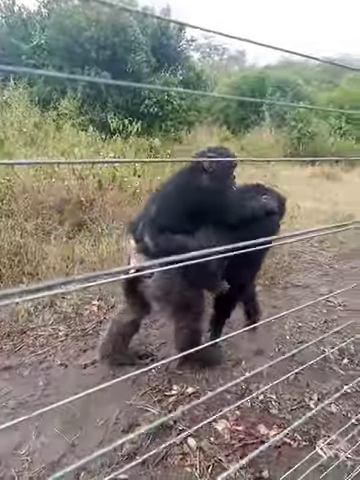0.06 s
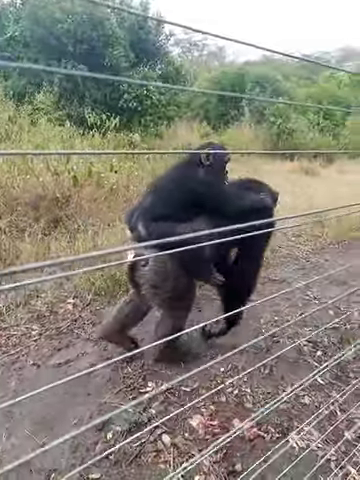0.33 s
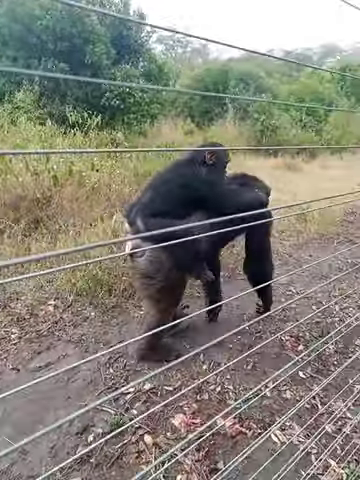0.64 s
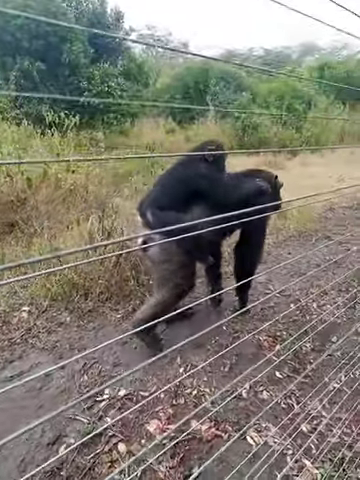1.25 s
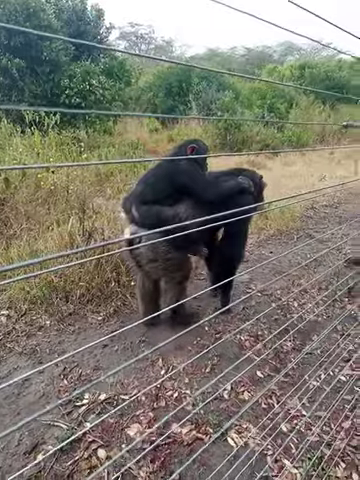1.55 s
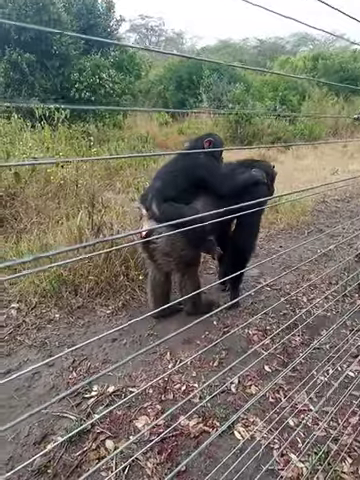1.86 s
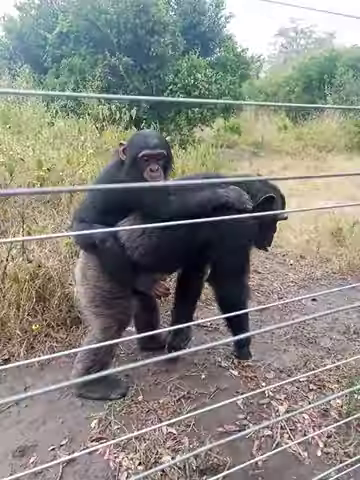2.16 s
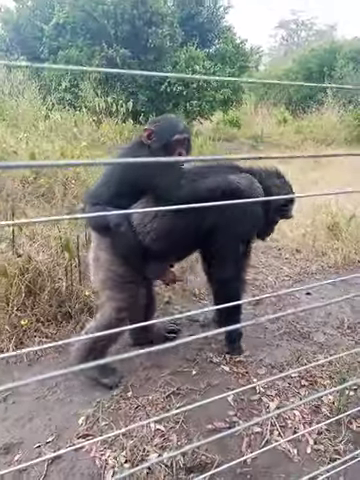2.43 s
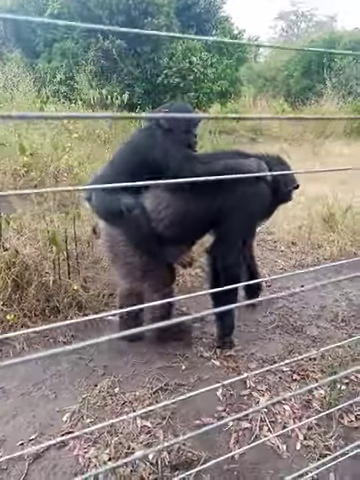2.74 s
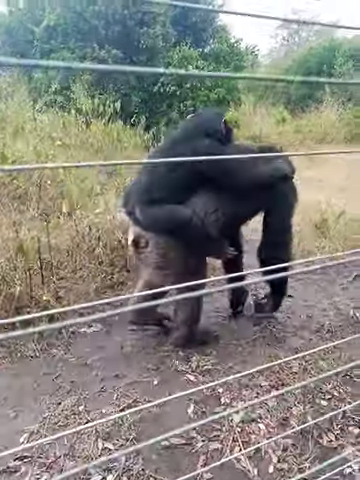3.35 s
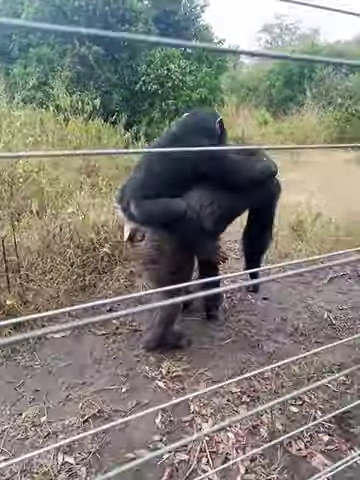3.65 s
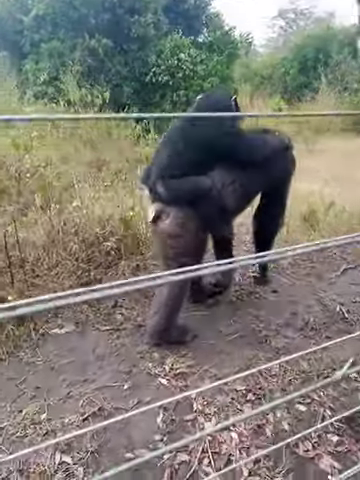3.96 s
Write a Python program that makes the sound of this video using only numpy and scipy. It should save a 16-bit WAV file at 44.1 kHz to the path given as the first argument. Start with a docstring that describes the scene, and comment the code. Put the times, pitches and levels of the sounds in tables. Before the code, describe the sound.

Small birds trade thin, rising chirps in quiet scrub, joined early by a few short nasal squawks. Dry litter ticks and snaps, and near the end the hand-held microphone is bumped and rubbed.

```python
"""Two small birds trade thin, rising chirps in the scrub beside a wire enclosure: gliding whistles with
side tones from a second vibration. Short nasal squawks and falling chips join in; the bushes echo.
Dry litter ticks and scuffs, with one sharp double snap, over a quiet outdoor hush and far twitters.
The hand-held microphone is bumped and, near the end, rubbed: low thuds and a scratchy rustle."""
import sys
import numpy as np
from scipy import signal
from scipy.fft import rfft, irfft
from scipy.io import wavfile
from scipy.ndimage import uniform_filter1d

SR = 44100
rng = np.random.default_rng(int(sys.argv[2]) if len(sys.argv) > 2 else 0)


def transcribe(signal):
    """Save signal, clipped to [-1, 1], as a 16-bit WAV file at the path in sys.argv[1]."""
    frames = np.atleast_2d(signal).T
    limited = np.clip(frames, -1, 1)
    pcm = np.round(limited * 32767).astype(np.int16)
    wavfile.write(sys.argv[1], SR, pcm)


N = 176400

# Background spectra: freq_hz, gain_db
HUSH_SPECTRUM = [(25, -21), (85, 0), (160, -4.5), (230, -10), (420, -13), (800, -17.5), (1900, -18),
                 (3000, -22), (5400, -32.5), (8600, -37.5), (13000, -38), (15200, -25), (16400, -53)]
BREEZE_SPECTRUM = [(35, -24.5), (60, -3), (95, 0), (140, -3.5), (250, -25.5)]
LITTER_SPECTRUM = [(2800, -29), (4200, 1.5), (5600, 4), (7000, -21.5), (9000, -45)]
# Leaves and far birds: time_s, level_db
LITTER_ENVELOPE = [(0, -65.5), (.37, -68), (.43, -75), (1.0, -71), (2.0, -69), (2.58, -66.5), (2.76, -59.5),
                   (2.95, -64.5), (3.12, -63), (3.22, -66), (4.0, -61)]
HUSH_DB, BREEZE_DB, BREEZE_SWING_DB = -70, -67.5, 4.5
LITTER_SWING_DB, LITTER_SWING_HZ = 1.5, 14
TWITTERS_PER_S, TWITTER_S, TWITTER_LOW_HZ, TWITTER_HIGH_HZ = 18, .035, 4100, 5800

# Grip rumble: freq_hz, gain_db
RUMBLE_SPECTRUM = [(25, -22), (55, 3.5), (90, 5.5), (175, -7.5), (290, -20.5), (480, -40)]
# Grip rumble: time_s, level_db
RUMBLE_ENVELOPE = [(2.32, -71), (2.36, -45), (2.45, -47), (2.52, -82), (3.22, -73), (3.25, -33.5),
                   (3.29, -46.5), (3.35, -37.5), (3.45, -40), (3.52, -29), (3.57, -55.5), (3.625, -36),
                   (3.70, -50), (3.76, -62.5), (3.96, -57.5)]
# Microphone bumps: centre_s, width_s, level_db, pitch_hz
MIC_BUMPS = [(2.368, 0.0041, -31.5, 108.5), (2.408, 0.011, -36, 91), (2.435, 0.0053, -39.5, 133),
             (2.702, 0.015, -47.5, 48.6), (2.751, 0.0084, -44.5, 99), (2.809, 0.01, -41, 83),
             (3.262, 0.0041, -22.5, 118), (3.365, 0.0039, -29.5, 146), (3.513, .014, -28, 89.2),
             (3.638, 0.0054, -30, 102)]
# Rubbing strokes: start_s, length_s, crest_fraction, middle_db, treble_db, top_db
RUB_STROKES = [(3.42, 0.032, 0.8, -46, -47.5, -62), (3.45, 0.062, 0.23, -44.5, -43.5, -56),
               (3.484, 0.086, 0.39, -53.5, -51.5, -67), (3.523, 0.33, 0.24, -58.5, -52.5, -72),
               (3.613, 0.061, 0.86, -46, -43, -53.5), (3.647, 0.012, 1, -36, -66, -68),
               (3.792, 0.036, 0.34, -56, -45.5, -47.5), (3.822, 0.13, 0.15, -52, -43, -53.5)]
# Casing ranges: freq_hz, gain_db
CASING_MIDDLE = [(250, -20), (450, -9), (750, 0.5), (1000, -5), (1350, 2), (1650, -4), (2100, 2),
                 (3000, -11), (4000, -24)]
CASING_TREBLE = [(2600, -23.5), (4000, 8), (5200, 10.5), (6500, 8), (8000, -7.5), (11000, -53)]
CASING_TOP = [(6500, -7), (8500, -13), (13500, -12), (15200, 3.5), (15900, -10), (16300, -34)]
STROKE_EXPONENT, SKIN_CATCH_DB, SKIN_CATCH_HZ = .96, 1, 90
FRICTION_GRAINS_PER_S, FRICTION_SPREAD_DB, FRICTION_HISS_GAIN = 1800, 4, .35

# Brushed litter: start_s, decay_s, level_db, centre_hz
LITTER_SCUFFS = [(2.13, .03, -53, 5900), (2.426, .016, -56, 2900)]
# Dry stalks: start_s, ring_peak_db, ring_hz, crack_re_ring_db
STALK_TICKS = [(0.461, -54, 7600, 3), (1.467, -31, 5000, -45), (1.948, -39, 5200, -44),
               (2.132, -48, 6630, -48), (2.675, -38, 5570, -37), (2.836, -46.5, 4970, -42),
               (2.895, -46, 5120, -40), (3.203, -41.5, 4330, -29), (3.3198, -37.5, 5020, -41),
               (3.401, -36, 6100, -37), (3.625, -27, 5200, -35), (3.7035, -44, 5270, -32),
               (3.723, -46, 4480, -30), (3.7745, -41.5, 7400, -14), (3.7966, -35.5, 6100, -4),
               (3.8037, -35, 5440, -19), (3.864, -27.5, 5400, -20)]
# Double snap: start_s, impulse_db
SNAP_CLICKS = [(1.6332, -33.5), (1.6452, -36.5)]
# Snap modes: freq_hz, gain_db, t60_s
SNAP_RESONANCES = [(355, -6, 0.021), (2350, -4, 0.005), (4170, 8, 0.0019), (5560, -0.5, 0.0036),
                   (10500, -33, .0006), (15000, 1, 0.00076)]
TICK_T60_S, TICK_SCATTER_S = .0025, .0007

# Falling chips: start_s, gain_db
CHIP_NOTES = [(2.704, -52.5), (2.72, -50), (2.784, -59), (2.804, -56.5), (2.823, -51)]
# Nasal notes: start_s, length_s, gain_db, start_hz, middle_hz, end_hz
SQUAWK_NOTES = [ (.573, .039, -50.5, 985, 990, 850), (.72, .044, -49, 880, 948, 880),
                (.757, .035, -46, 930, 1015, 880), (.872, .046, -49, 860, 945, 900),
                (.908, .034, -48.5, 960, 915, 830)]
# Squawk timbre: harmonic_number, gain_db
SQUAWK_PARTIALS = [(3, -25), (4, -22), (5, -2.5), (6, -5), (7, -25), (8, -22), (10, -34)]
# Chirps: start_s, length_s, gain_db, start_hz, third_hz, two_thirds_hz, end_hz, spacing_hz, side_db
CHIRP_NOTES = [ (0, .05, -52, 6750, 6950, 7100, 7200, 1800, -18),
               (.128, .128, -52.5, 5650, 6080, 6620, 7020, 1850, -14),
               (.636, .036, -48.5, 5400, 5950, 6300, 6400, 2300, -30),
               (1.022, .092, -45.5, 5300, 5600, 5450, 6750, 1950, -12),
               (1.059, .075, -46.5, 5800, 5000, 4900, 6900, 1850, -15),
               (1.217, .165, -45.5, 5950, 6550, 6800, 7300, 1870, -16),
               (1.279, .092, -50, 5950, 5850, 6100, 6750, 1750, -8),
               (1.539, .142, -48.5, 5650, 6150, 6500, 7300, 1880, -13),
               (1.57, .038, -52, 4800, 4650, 4050, 3500, 1300, -10),
               (1.76, .08, -50.5, 5450, 5200, 4200, 5800, 1950, -11),
               (1.798, .107, -47.5, 5500, 5650, 6200, 7350, 1780, -12),
               (2.264, .098, -50.5, 5100, 5480, 5830, 6500, 1780, -15),
               (2.518, .2, -59, 6100, 6580, 6850, 7300, 1740, -14),
               (3.754, .034, -50, 6400, 5950, 5600, 5500, 1800, -18)]
CHIP_S, CHIP_TOP_HZ, CHIP_END_HZ = .0162, 5100, 3750
ATTACK_S, RELEASE_S, FADE_DB = .011, .008, 2.3
FLUTTER_DB, FLUTTER_RATE_HZ, WAVER_HZ, WAVER_RATE_HZ = 2.6, 110, 105, 330
SCOOP_FRACTION, SCOOP_S, FULL_SCOOP_LENGTH_S = .21, .0075, .1203
LOWER_SIDE_DB, SIDE_FALL_DB_PER_HZ, OCTAVE_DB = -22, .010, -31
RASP_DB, RASP_SMEAR_S, CHIRP_CUTOFF_HZ = -18, .03, 8800

SCRUB_T60_S, SCRUB_BUILD_S, BIRD_ECHO_DB, CLICK_ECHO_DB = .21, .0044, -6.5, -24
CUTOFF_HZ = 16400


def from_db(db):
    """Decibels to gain."""
    return 10 ** (np.asarray(db) / 20)


def unit_rms(x):
    """Scale to unit power."""
    return x / np.sqrt(np.mean(x ** 2) + 1e-20)


def envelope(points):
    """Level curve to gain per sample; silent before its first point."""
    time_s, level_db = np.transpose(points)
    return from_db(np.interp(np.arange(N) / SR, time_s, level_db, left=-140))


def add(out, start_s, x):
    """Mix x in at start_s."""
    i = max(int(start_s * SR), 0)
    out[i:i + len(x)] += x[:max(N - i, 0)]


def coloured(noise, spectrum):
    """Shape noise to a spectrum; unit power."""
    hz, db = np.transpose(spectrum)
    log_hz = np.log(np.arange(N // 2 + 1) * SR / N + 1)
    gain = from_db(np.interp(log_hz, np.log(hz), db, left=-70, right=-70))
    return unit_rms(irfft(rfft(noise) * gain, N))


def drift(rate_hz, size):
    """Smooth random wander, spread about 1."""
    r = np.exp(-2 * np.pi * rate_hz / SR)
    wander = signal.lfilter([1], [1, -2 * r, r * r], rng.standard_normal(size + SR // 2))
    return unit_rms(wander[-size - SR // 10:])[-size:]


def ring(x, hz, t60_s):
    """One damped resonance."""
    r, w = from_db(-60 / (t60_s * SR)), 2 * np.pi * hz / SR
    return signal.lfilter([0, np.sin(w)], [1, -2 * r * np.cos(w), r * r], x + 1e-18)


def grains(per_s, spread_db, hiss_gain):
    """Random tiny clicks of uneven size in hiss."""
    sizes = from_db(spread_db * np.minimum(rng.exponential(1, N), 5)) * rng.choice([-1, 1], N)
    return unit_rms(sizes * (rng.random(N) < per_s / SR)) + hiss_gain * rng.standard_normal(N)


def note(pitch_hz):
    """Wavering, fluttering sine along a pitch curve."""
    t = np.arange(len(pitch_hz)) / SR
    gate = np.minimum(t / ATTACK_S, 1) * np.minimum((t[-1] - t) / RELEASE_S, 1)
    gain = from_db(FLUTTER_DB * drift(FLUTTER_RATE_HZ, len(t)) - FADE_DB)
    hz = pitch_hz + WAVER_HZ * drift(WAVER_RATE_HZ, len(t))
    return np.sqrt(2) * gate * gain * np.sin(2 * np.pi * np.cumsum(hz) / SR)


def scrub_echo(x):
    """Bushes and trees scatter sound back: a dense tail of unit energy."""
    t = np.arange(SR // 2) / SR
    tail = rng.standard_normal(len(t)) * from_db(-60 * t / SCRUB_T60_S)
    tail *= 1 - np.exp(-t / SCRUB_BUILD_S)
    return signal.fftconvolve(x, tail / np.linalg.norm(tail))[:N]


def twitters():
    """Far birds: short random glides through the bushes; unit power."""
    out = np.zeros(N)
    for slot in range(int(TWITTERS_PER_S * N / SR)):
        start_s = (slot + rng.random()) / TWITTERS_PER_S
        ends_hz = rng.uniform(TWITTER_LOW_HZ, TWITTER_HIGH_HZ, 2)
        add(out, start_s, note(np.linspace(*ends_hz, int(TWITTER_S * SR))))
    return unit_rms(scrub_echo(out))


def outdoors():
    """Steady hush, light air on the microphone, dry leaves mingled with far birds."""
    hush = from_db(HUSH_DB) * coloured(rng.standard_normal(N), HUSH_SPECTRUM)
    gusts = from_db(BREEZE_DB + BREEZE_SWING_DB * drift(rate_hz=6, size=N))
    breeze = gusts * coloured(rng.standard_normal(N), BREEZE_SPECTRUM)
    leaves = coloured(grains(per_s=1500, spread_db=3.5, hiss_gain=1), LITTER_SPECTRUM)
    bushes = unit_rms(leaves + twitters()) * envelope(LITTER_ENVELOPE)
    return hush + breeze + bushes * from_db(LITTER_SWING_DB * drift(LITTER_SWING_HZ, N))


def handling():
    """Soft bumps swing the microphone briefly; the shifting grip rumbles."""
    out = envelope(RUMBLE_ENVELOPE) * coloured(rng.standard_normal(N), RUMBLE_SPECTRUM)
    t = np.arange(-SR // 10, SR // 10) / SR
    for centre_s, width_s, db, hz in MIC_BUMPS:
        thud = np.exp(-.5 * (t / width_s) ** 2) * np.sin(2 * np.pi * hz * t)
        add(out, centre_s + t[0], from_db(db) * thud)
    return out


def rubbing():
    """Skin catches and slips: each stroke sends friction grains into three ranges of the casing."""
    t = np.arange(N) / SR
    friction = grains(FRICTION_GRAINS_PER_S, FRICTION_SPREAD_DB, FRICTION_HISS_GAIN)
    friction *= from_db(SKIN_CATCH_DB * drift(SKIN_CATCH_HZ, N))
    powers = np.zeros((3, N))
    for start_s, length_s, crest_fraction, *bands_db in RUB_STROKES:
        crest_s = start_s + length_s * np.clip(crest_fraction, .02, .98)
        swell = np.interp(t, [start_s, crest_s, start_s + length_s], [0, 1, 0]) ** STROKE_EXPONENT
        powers += (from_db(bands_db)[:, None] * swell) ** 2
    bands = CASING_MIDDLE, CASING_TREBLE, CASING_TOP
    return sum(np.sqrt(power) * coloured(friction, band) for power, band in zip(powers, bands))


def scuffs():
    """Brushed litter: soft, decaying bursts of grains."""
    out, t = np.zeros(N), np.arange(N) / SR
    crunch = grains(FRICTION_GRAINS_PER_S, FRICTION_SPREAD_DB, FRICTION_HISS_GAIN)
    for start_s, decay_s, db, hz in LITTER_SCUFFS:
        decay = (t > start_s) * np.exp(-abs(t - start_s) / decay_s)
        out += from_db(db) * decay * coloured(crunch, [(hz / 2, -24), (hz, 0), (hz * 2, -36)])
    return out


def ticks():
    """A dry stalk gives way: a brief crack that rings for a few cycles."""
    out, t = np.zeros(N), np.arange(SR // 50) / SR
    for start_s, db, hz, crack_db in STALK_TICKS:
        crack = np.diff(rng.standard_normal(len(t)) * np.exp(-t / TICK_SCATTER_S), prepend=0)
        body = ring(ring(crack, hz, TICK_T60_S), hz, TICK_T60_S)
        tick = body / np.abs(body).max() + from_db(crack_db) * crack / np.abs(crack).max()
        add(out, start_s, from_db(db) * tick)
    return out


def double_snap():
    """Two hard clicks into heavily damped modes."""
    out, clicks = np.zeros(N), np.zeros(N)
    for start_s, db in SNAP_CLICKS:
        add(clicks, start_s, from_db([db]))
    for hz, db, t60_s in SNAP_RESONANCES:
        diff_gain = 2 * np.sin(np.pi * hz / SR)
        out += from_db(db) * np.diff(ring(clicks, hz, t60_s), prepend=0) / diff_gain
    return out


def chips():
    """Very short downward whistles."""
    out = np.zeros(N)
    hz = np.linspace(CHIP_TOP_HZ, CHIP_END_HZ, int(CHIP_S * SR))
    for start_s, db in CHIP_NOTES:
        add(out, start_s, from_db(db) * note(hz))
    return out


def squawks():
    """Short nasal notes: an arching buzz, strongest in harmonics 5 and 6."""
    out = np.zeros(N)
    for start_s, length_s, db, *pitches_hz in SQUAWK_NOTES:
        hz = np.polyval(np.polyfit([0, .5, 1], pitches_hz, 2), np.linspace(0, 1, int(length_s * SR)))
        buzz = sum(from_db(partial_db) * note(k * hz) for k, partial_db in SQUAWK_PARTIALS)
        add(out, start_s, from_db(db) * buzz)
    return out


def chirps():
    """A whistle scoops up and glides; a second vibration adds side tones, and the air rasps."""
    out = np.zeros(N)
    for start_s, length_s, db, *pitches_hz, spacing_hz, side_db in CHIRP_NOTES:
        t = np.arange(int(length_s * SR)) / SR
        progress = t / length_s
        glide_hz = np.polyval(np.polyfit(np.arange(4) / 3, pitches_hz, 3), progress)
        scoop = SCOOP_FRACTION * min(length_s / FULL_SCOOP_LENGTH_S, 1) * np.exp(-(t / SCOOP_S) ** 2)
        hz = glide_hz * (1 - scoop) + WAVER_HZ * drift(WAVER_RATE_HZ, len(t))
        phase = 2 * np.pi * np.cumsum(hz) / SR
        beat = 2 * np.pi * spacing_hz * t
        tone = np.sin(phase) + from_db(OCTAVE_DB) * np.sin(2 * phase)
        for k in range(1, 4):
            sides = np.sin(phase + k * beat) + from_db(LOWER_SIDE_DB) * np.sin(phase - k * beat)
            tone += from_db(k * side_db - (k - 1) * spacing_hz * SIDE_FALL_DB_PER_HZ) * sides
        gate = np.minimum(t / ATTACK_S, 1) * np.minimum((length_s - t) / RELEASE_S, 1)
        gain = from_db(db - FADE_DB * (progress + .5) + FLUTTER_DB * drift(FLUTTER_RATE_HZ, len(t)))
        add(out, start_s, np.sqrt(2) * tone * gate * gain)
    breath = uniform_filter1d(np.abs(out), size=int(RASP_SMEAR_S * SR))
    rasp = breath * coloured(rng.standard_normal(N), LITTER_SPECTRUM)  # same band as the leaves
    lowpass = signal.butter(4, CHIRP_CUTOFF_HZ, fs=SR, output="sos")
    return signal.sosfilt(lowpass, out + from_db(RASP_DB) * rasp)


def scene():
    """Birds in the scrub, almost dry clicks nearer by, microphone noises and background; mono."""
    birds = chirps() + squawks() + chips()
    clicks = ticks() + double_snap() + scuffs()
    echo = scrub_echo(from_db(BIRD_ECHO_DB) * birds + from_db(CLICK_ECHO_DB) * clicks)
    return (birds + clicks + echo + handling() + rubbing() + outdoors())[None]


def record(dry):
    """Steep low-pass."""
    return signal.sosfilt(signal.ellip(10, .2, 70, CUTOFF_HZ, fs=SR, output="sos"), dry)


dry = scene()
out = record(dry)
transcribe(out)
```